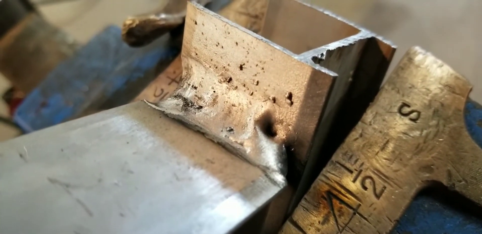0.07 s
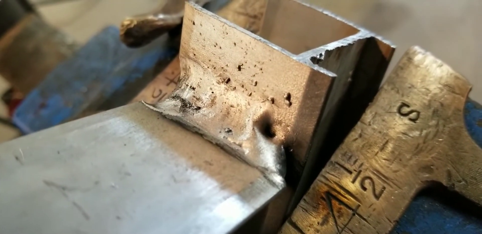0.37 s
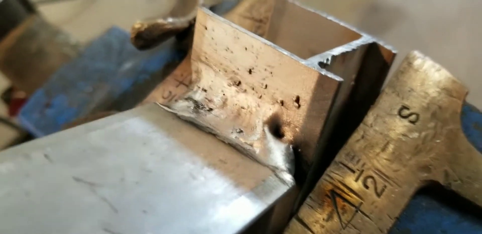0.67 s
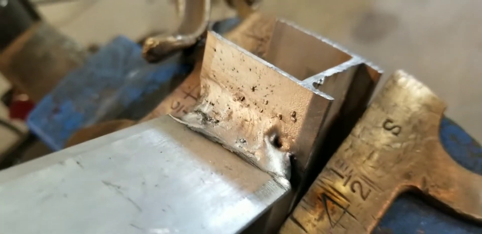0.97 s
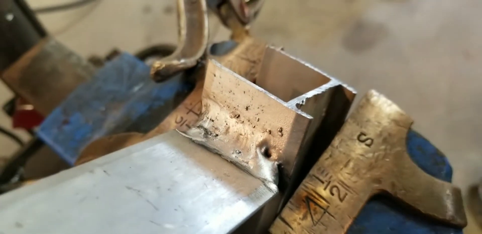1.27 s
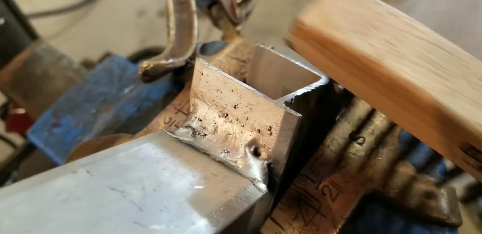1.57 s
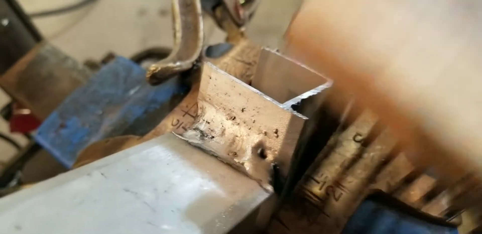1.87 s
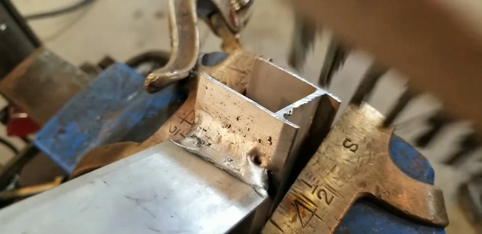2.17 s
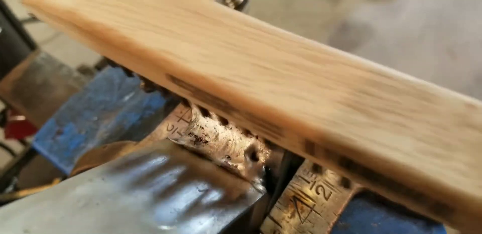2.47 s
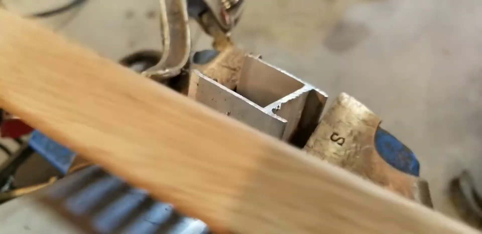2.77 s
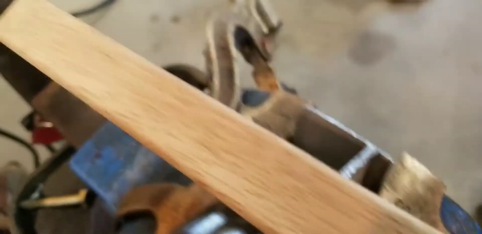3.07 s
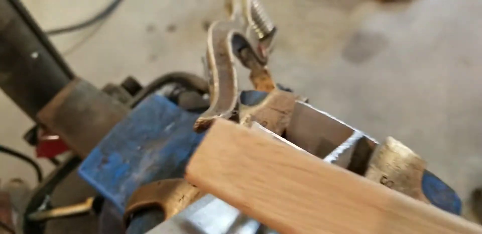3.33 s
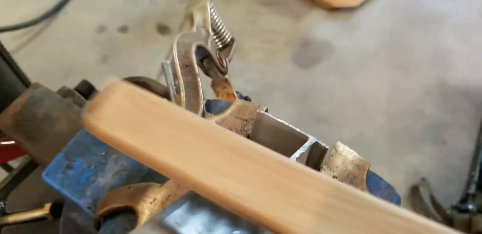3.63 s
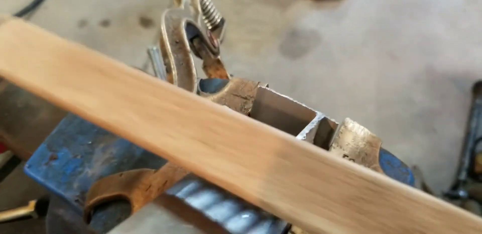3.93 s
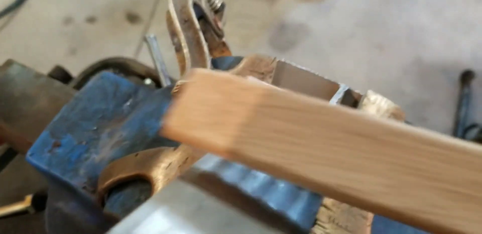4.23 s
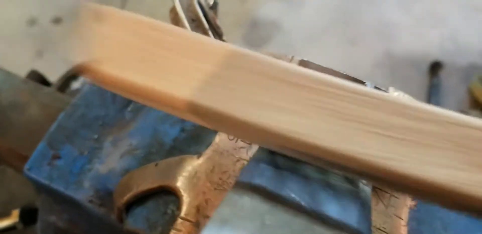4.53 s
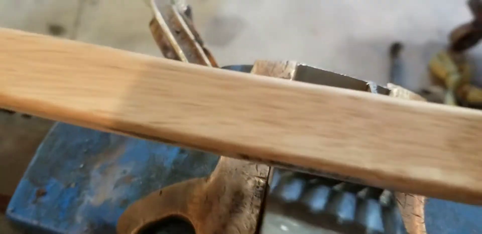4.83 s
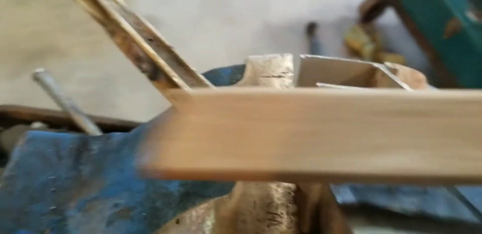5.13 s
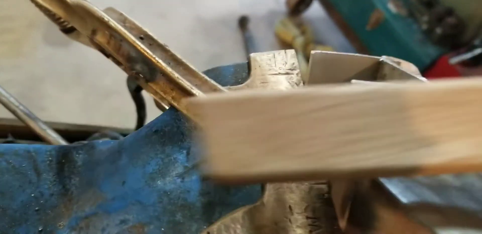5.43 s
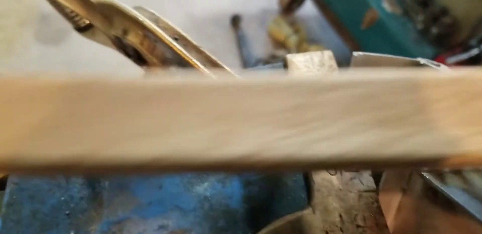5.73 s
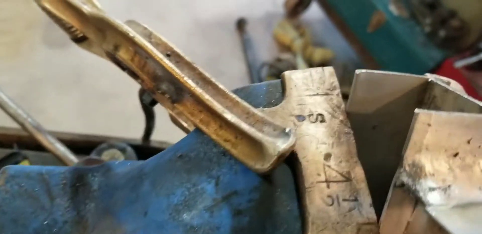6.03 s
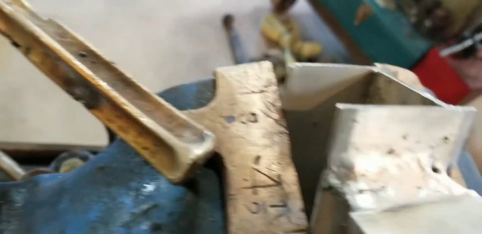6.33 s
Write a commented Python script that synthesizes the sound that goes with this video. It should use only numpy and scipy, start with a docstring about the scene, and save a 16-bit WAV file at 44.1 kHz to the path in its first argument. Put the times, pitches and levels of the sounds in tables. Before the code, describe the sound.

A faint low room rumble opens the scene in a small workshop. At about 0.5 seconds a finger slips on the microphone with a dull tick, slightly to the right, and loose brush wires whisper faintly. At 1.4 seconds a wooden-handled steel wire brush knocks against a metal tube held in a vice, followed by a few light, scratchy dabs and another bump. From about 2.2 seconds the brush scrubs quickly back and forth, four or five strokes a second, close by. Each stroke has a fine high sizzle and a coarser rasp, with the tube ringing and the vice rumbling underneath. The handle thuds against the work several times, most strongly between 2.7 and 3 seconds. The sizzle drifts from left to slightly right, with a brief room echo. The scrubbing stops at about 6 seconds, leaving the faint rumble.

```python
"""A wooden-handled steel wire brush scrubs a weld on a metal tube held in a vice, in a small workshop.
First, over a low room rumble, a finger slips on a hand-held camera close by and loose wires whisper.
At about 1.4 s come a knock and a few light dabs, then quick strokes back and forth until about 6 s.
Thousands of wire tips catch and slip: the wires sizzle, the tube rings and the vice rumbles.
Early in the scrubbing the handle bumps the work at times, and the room echoes it all briefly."""
import sys
import numpy as np
from scipy import signal
from scipy.fft import rfft, irfft, next_fast_len
from scipy.io import wavfile
from scipy.ndimage import map_coordinates

SR = 44100
rng = np.random.default_rng(int(sys.argv[2]) if len(sys.argv) > 2 else 0)


def dump_mix(stems):
    """Bounce the given channels to the path in sys.argv[1] as a 16-bit WAV at rate SR."""
    frames = np.atleast_2d(stems).T  # one column per channel
    limited = np.clip(frames, -1, 1)  # hard clip at full scale
    pcm = np.round(limited * 32767).astype(np.int16)
    wavfile.write(sys.argv[1], SR, pcm)


N = 282145

# The tube's ringing notes; a wider one dies sooner. A positive left_db means louder on the left.
# pitch_hz, width_hz, brushed_db, struck_db, left_db
TUBE_NOTES = [(489.5, 2.5, -20, -30.5, -3), (518.8, 22, -10, -28, 5.5), (567, 1.6, -15.5, -23, 2.5),
              (1016.7, 4.2, -13, -20.5, 19), (1166, 4.8, -9, -11.5, 8.5), (1254, 4.4, -6.5, -9.5, 4),
              (1498, 38, 1, 6.5, 19), (1543, 31, 2, 4, 8.5), (1739, 42, -1, -6, 5.5),
              (1788, 28, 1.5, -16.5, 10.5), (1890, 49, -6.5, 0.5, 4.5), (1971, 22, -7, -28.5, 15.5),
              (2100, 40, -11.5, 2, 17), (2211, 2.6, -14, -7, 12), (2455, 210, -11.5, 4.5, 0),
              (2859, 2.5, -19, -32.5, -3.5), (3056, 34, -13.5, -14, -9.5), (3167, 9.7, -13.5, -25.5, 6),
              (3750, 210, -12, 8.5, 1), (4030, 14, -17.5, -10, 8), (4196, 14, -13, -24.5, 11.5),
              (5090, 110, -13, -28, -3.5)]
# The tone of the wires' fine, high sizzle: pitch_hz, level_db
SIZZLE_TONE = [(6500, -45), (7700, -26.5), (8500, -16.5), (9900, -2), (11300, -0.5), (12200, -3.5),
               (13000, 1.5), (14200, -2.5), (15700, -1), (18000, -12)]
# The tone of the wires' coarse, lower rasp: pitch_hz, level_db
RASP_TONE = [(350, -40.5), (650, -14), (900, -3), (1400, -3.5), (2100, 3.5), (2750, -4), (3700, 3.5),
             (4600, -2), (5150, 3), (5600, -6), (6300, -2.5), (7400, -11), (8500, -4), (12000, -35.5)]


def amp(db):
    """Turn decibels into a gain to multiply by."""
    return 10 ** (np.asarray(db) / 20)


def unit(x):
    """Scale to an average power of 1."""
    return x / np.sqrt(np.mean(np.abs(x) ** 2) + 1e-20)


def pan(left_db):
    """Left and right gains that place a sound without changing its power."""
    return unit(amp([[left_db / 2], [-left_db / 2]]))


def along(points, hz):
    """Read between (pitch_hz, value) points, spacing the octaves evenly."""
    pitches, values = np.transpose(points)
    return np.interp(np.log(hz + 1), np.log(pitches), values)


def curves(rows):
    """One value per sample for each column after the time."""
    times, *columns = np.transpose(rows)
    return [np.interp(np.arange(N) / SR, times, column) for column in columns]


def wobble(rate):
    """A smooth curve through `rate` random values a second."""
    return map_coordinates(rng.standard_normal(int(N * rate / SR) + 4), [np.arange(N) * rate / SR])


def filtered(x, response):
    """Change the strength and phase of each frequency by response(hz)."""
    size = next_fast_len(N + SR)
    return irfft(rfft(x, size) * response(np.fft.rfftfreq(size, 1 / SR)), size)[..., :N]


def coloured(x, tone):
    """Give a sound a tone, listed as (pitch_hz, level_db) points."""
    return filtered(x, lambda hz: unit(amp(along(tone, hz))))


def resonate(x, notes, damping_hz=0):
    """Make a sound ring at notes (pitch_hz, width_hz, level_db, left_db); damping widens them all."""
    def response(hz):
        total = 0
        for k, (pitch, width, db, left_db) in enumerate(notes):
            width += damping_hz
            peak = 1j * hz * np.sqrt(width) / (pitch ** 2 - hz ** 2 + 1j * hz * width)
            total += (-1) ** k * pan(left_db) * amp(db) * peak
        return unit(total)
    return filtered(x, response)


def pair(x, alike):
    """Blend two unrelated channels: 0 keeps them unrelated, 1 makes them the same."""
    turn = np.arccos(np.clip(alike, -1, 1)) / 2
    return np.cos(turn) * x[0] + np.sin(turn) * np.array([x[1], -x[1]])


def add(track, start_s, sound):
    """Mix a sound into a track."""
    part = track[:, round(start_s * SR):][:, :sound.shape[-1]]
    part += sound[..., :part.shape[1]]


def swell(start_s, length_s, rise_s, fall_s):
    """The speed of one movement, 0 to 1: it picks up, holds and eases to a stop."""
    t = np.arange(N) / SR - start_s
    rise = np.sin(np.pi / 2 * np.clip(t / rise_s, 0, 1))
    return rise * np.clip((length_s - t) / fall_s, 0, 1) ** 1.5


def slips(per_s, spread_db):
    """Rubbing surfaces catch and let go: tiny clicks at random moments, with random force."""
    chance = np.clip(per_s / SR, 1e-3, 1)
    force = rng.choice([-1, 1], (2, N)) * amp(spread_db * rng.standard_normal((2, N)))
    return unit((rng.random((2, N)) < chance) * force / np.sqrt(chance))


def room_rumble():
    """A low, gently wavering rumble with faint hiss."""
    # The rumble's tone: pitch_hz, level_db
    tone = [(18, -47), (28, -20), (42, -0.5), (65, -1.5), (120, -8.5), (200, -13.5), (400, -24.5),
            (800, -43), (1500, -44), (2800, -44.5), (5000, -54.5), (8000, -65.5), (12500, -46.5),
            (16000, -49.5)]
    # Its slow rise and fall: time_s, level_db
    loudness = [(0, -54), (1.5, -51), (6.3, -57)]
    noise = pair(rng.standard_normal((2, N)), alike=0.8)
    level_db, = curves(loudness)
    return coloured(noise, tone) * amp(level_db + 1.8 * wobble(7))


def workshop_echo(x):
    """The room answers with a smooth echo whose high notes die first."""
    # How long the echo takes to fall by 60 dB: pitch_hz, fade_s
    fade_times = [(100, 0.45), (600, 0.92), (2500, 0.53), (6000, 0.36), (14000, 0.24)]
    hz, t, spectrum = signal.stft(rng.standard_normal((2, SR * 3 // 4)), SR, nperseg=256)
    tail = signal.istft(spectrum * amp(-60 * t / along(fade_times, hz)[:, None]), SR, nperseg=256)[1]
    tail = np.pad(tail / np.linalg.norm(tail[0]), ((0, 0), (SR // 150, 0)))  # arrives a little late
    return signal.fftconvolve(x, tail, axes=1)[:, :N]


def finger_on_camera():
    """A finger rubs near the right microphone and slips in dull ticks, each with a small low push."""
    # The sudden slips: start_s, level_db, pitch_hz
    taps = [(.496, -48, 1800), (0.5099, -28.5, 870), (.512, -22, 2400), (0.517, -29, 1300),
            (0.52, -21, 1600), (0.53, -6, 1510)]
    # The slides: start_s, length_s, rise_s, fall_s, level_db
    slides = [(.488, .056, .03, .022, -50.5), (.514, 0.024, 0.012, .008, -45), (.55, .18, .01, .08, -63.5)]
    # The tone of rubbing skin: pitch_hz, level_db
    skin_tone = [(60, -8.5), (150, 8), (600, -8), (2200, -7.5), (3200, -10.5), (4600, -9), (6500, -22),
                 (8000, -43), (14000, -19)]
    tick_tone = [(30, 4.0), (2200, -2.0), (4500, -5.5), (8000, -26.0), (16000, -34.0)]  # same columns
    ticks, t = np.zeros((2, N)), np.arange(SR // 10) / SR
    for start_s, db, hz in taps:
        tick = np.sin(2 * np.pi * hz * t) * np.exp(-t * hz / 0.5)
        push = -.16 * np.sin(2 * np.pi * 210 * t) * amp(-60 * t / 0.015)
        add(ticks, start_s, amp(db) * pan(-20) * (tick + push))
    sliding = sum(amp(db) * swell(*timing) for *timing, db in slides)
    rub = pan(-12) * coloured(slips(2500, spread_db=6) * sliding, skin_tone)
    return rub + amp(-3) * coloured(ticks, tick_tone)


def loose_wires():
    """Loose wires whisper against each other as the brush is picked up or hovers."""
    # The brush's small moves: start_s, length_s, rise_s, fall_s, level_db, left_db
    moves = [(0.523, 0.065, 0.016, 0.05, -46.5, -13), (.55, 0.2, .125, 0.062, -59, -10),
             (1.89, .13, .02, .07, -58.5, 7)]
    stir = sum(pan(left_db) * amp(db) * swell(*timing) for *timing, db, left_db in moves)
    return coloured(slips(4000, spread_db=1.5) * stir, SIZZLE_TONE)


def handle_bumps():
    """Each bump thuds through the bench, rings the tube under the damping brush and shakes the wires."""
    # The handle hits the work; the brush takes an extra 60 dB off the ring in damping_s.
    # start_s, thud_db, thud_hz, left_db, ring_db, centre_hz, damping_s, crash_db
    bumps = [(1.4379, -15.5, 188, -10, -26.5, 2710, 0.96, -36.5),
             (1.453, -24.5, 193, -9.5, -40, 1050, 0.2, -47), (1.6228, -60, 200, -2, -44.5, 1700, 0.8, -38),
             (1.855, -41.5, 388, -0.5, -73, 1195, 0.057, -61),
             (1.881, -28, 176, 14.5, -37.5, 2580, 3.5, -49), (2.226, -27.5, 281, 2.5, -51, 1500, 0.28, -60),
             (2.544, -58, 202, -7.5, -40, 2000, 0.065, -36),
             (2.5647, -63.5, 200, -0.5, -41.5, 2015, 0.11, -32),
             (2.685, -16.5, 226, 5.5, -32.5, 1400, 0.16, -30.5),
             (2.8372, -15.5, 202, 8, -27, 1400, 0.065, -25.5), (2.8426, -34, 250, 6, -20, 940, 0.12, -29),
             (2.9617, -7, 122, -14.5, -25.5, 1300, 0.054, -31),
             (2.971, -22, 75, -4.5, -36, 1300, 0.087, -32), (3.394, -28.5, 204, 0, -31, 1410, 0.067, -42)]
    knocks, crash, t = np.zeros((2, N)), np.zeros((2, N)), np.arange(SR // 2) / SR
    for start_s, thud_db, thud_hz, left_db, ring_db, centre_hz, damping_s, crash_db in bumps:
        ring = 0
        for hz, width, _, struck_db, note_left_db in TUBE_NOTES:
            # the place and hardness of the hit favour the notes near centre_hz
            gain = pan(note_left_db) * amp(struck_db - 7.9 * np.log2(hz / centre_hz) ** 2)
            cycles = hz * t + rng.random() + 0.24 * rng.random((2, 1))
            ring += gain * np.exp(-np.pi * width * t) * np.sin(2 * np.pi * cycles)
        ring *= amp(-60 * t / damping_s) * (1 - np.exp(-t / .0006))
        add(knocks, start_s, amp(ring_db) * ring / ring[:, :SR // 100].std())
        thud = np.sin(2 * np.pi * thud_hz * t) * np.exp(-t * thud_hz / 0.5)
        boom = 0.21 * np.sin(2 * np.pi * 72 * t) * amp(-60 * t / 0.1)
        clack = 0.18 * np.sin(2 * np.pi * 430 * t) * amp(-60 * t / 0.034)
        add(knocks, start_s, amp(thud_db) * pan(left_db) * (thud + boom + clack))
        add(crash, start_s, amp(crash_db) * rng.standard_normal((2, len(t))) * amp(-60 * t / 0.035))
    return knocks + coloured(crash, SIZZLE_TONE) + amp(0.5) * coloured(crash, RASP_TONE)


def brush_effort():
    """How hard the brush drives the wires, tube and vice; overlapping contacts add their power."""
    # Dabs and strokes. ring_db and vice_db are added to wire_db; the ring changes by growth_db.
    # start_s, length_s, rise_s, fall_s, wire_db, ring_db, growth_db, vice_db
    strokes = [(1.453, 0.25, 0.04, 0.09, -49, 1.5, -11, -7.5),
               (1.512, 0.1, 0.094, 0.037, -29.5, -14, 0, -31.5),
               (1.661, 0.062, 0.034, 0.036, -36.5, -9, 15, -26.5),
               (1.87, 0.067, 0.02, 0.038, -39, -1.0, 10, -10.5),
               (1.991, 0.093, 0.061, 0.033, -40.5, -8, -0.5, -22.5),
               (2.227, 0.3, 0.217, 0.069, -32, -1, -7, -20.5),
               (2.586, 0.11, 0.081, 0.075, -28.5, -6, -11, -23.5),
               (2.68, 0.053, 0.014, 0.0086, -46, 0, 2, -1.5),
               (2.744, 0.14, 0.043, 0.035, -42, 3.1, -5.5, -10),
               (2.855, 0.31, 0.019, 0.16, -33.5, -0.1, -5.5, -9),
               (3.112, 0.24, 0.043, 0.085, -33, 0, -4.5, -9.5),
               (3.364, 0.24, 0.049, 0.13, -34, 1.6, -3, -12),
               (3.57, 0.16, 0.078, 0.038, -34, 3.5, -2.5, -7),
               (3.746, 0.26, 0.119, 0.1, -30.5, 0.7, -5, -15.5),
               (3.989, 0.25, 0.071, 0.098, -31.5, -2.5, -4.5, -9.5),
               (4.21, 0.22, 0.072, 0.064, -30.5, 1.6, -0.5, -9.5),
               (4.445, 0.21, 0.058, 0.072, -32.5, -3, -14.5, -9),
               (4.633, 0.23, 0.073, 0.045, -34, 1.5, 4.5, -10.5),
               (4.88, 0.19, 0.046, 0.073, -32, -1.4, -5, -7),
               (5.037, 0.27, 0.1, 0.071, -32.5, -1.2, -3, -7.5),
               (5.318, 0.18, 0.095, 0.093, -29.5, 0.3, 4, -4.5),
               (5.493, 0.22, 0.11, 0.069, -32, 1.7, -4, -3.2),
               (5.726, 0.24, 0.052, 0.063, -31.5, -1.5, 7, -8)]
    # Tufts snag on the weld and spring free: start_s, wire_db, ring_db
    snags = [(1.56, -28, -48), (1.679, -36.5, -52), (2.011, -48.5, -55), (2.335, -30, -31.5),
             (2.395, -27.5, -47), (2.45, -28.5, -41), (2.915, -31, -27), (3.136, -33.5, -34),
             (3.372, -38.5, -44), (3.388, -38, -37.5), (3.604, -38.5, -30.5), (3.828, -32.5, -31),
             (4.028, -43, -27), (4.243, -33.5, -34), (4.462, -37.5, -28), (4.676, -35.5, -31),
             (4.8, -46, -32), (4.898, -38.5, -28), (5.078, -39, -33), (5.349, -40, -29),
             (5.744, -35, -33.5), (5.769, -34, -26)]
    bite_db = 6  # the vice shakes this much more at the start of a stroke than at its end
    # between strokes the wires stay on the work and creak as they flip over
    resting = swell(start_s=2.22, length_s=3.74, rise_s=.03, fall_s=.04)
    power = (amp([[-47.5], [-45.5], [-53]]) * resting) ** 2  # wires, tube, vice
    for start_s, length_s, rise_s, fall_s, wire_db, ring_db, growth_db, vice_db in strokes:
        speed = swell(start_s, length_s, rise_s, fall_s)
        moving = np.flatnonzero(speed)
        travel = (moving / SR - start_s) / length_s - .5  # 0 halfway through the stroke
        extra_db = np.array([np.zeros(len(moving)), ring_db + growth_db * travel,
                             vice_db - bite_db * travel])
        power[:, moving] += (amp(wire_db + extra_db) * speed[moving]) ** 2
    jerk = swell(0, length_s=.037, rise_s=.004, fall_s=.034)[:SR // 10]
    for start_s, wire_db, ring_db in snags:
        add(power, start_s, (amp([[wire_db], [ring_db], [ring_db - 7]]) * jerk) ** 2)
    return np.sqrt(power)


def bending(x, depth_db, width_hz, per_s):
    """Many small peaks in the tone come and go as the tufts bend and move."""
    hz, t, spectrum = signal.stft(x, SR, nperseg=1536)
    grid = np.meshgrid(hz / width_hz, t * per_s, indexing="ij")
    shared, left, right = (map_coordinates(rng.standard_normal((512, 256)), grid, order=1, mode="mirror")
                           for _ in range(3))
    gain = unit(amp(depth_db * unit(shared + np.array([left, right]))))
    return signal.istft(spectrum * gain, SR, nperseg=1536)[1][:, :N]


def scattered(x, turn_rad, width_hz):
    """Sound takes its own paths around handle and vice to each microphone, which shifts its phase."""
    shifts = rng.standard_normal(256)
    phase = lambda hz: turn_rad * map_coordinates(shifts, [hz / width_hz], order=1, mode="mirror")
    return filtered(x, lambda hz: np.exp(1j * np.outer([1, -1], phase(hz))))


def vice_rumble(slips_per_s, force):
    """The heavy vice rumbles, and drones lower or higher with the brush's place on the tube."""
    # The vice's tone: pitch_hz, level_db
    tone = [(20, -46), (35, -15.5), (60, 4), (110, 1.5), (240, 2.5), (390, -9.5), (535, -1.5), (700, -2.5),
            (950, -3.5), (1600, -38.5)]
    # The strength of the two drones: time_s, low_db, high_db
    drone_levels = [(2.2, -6, -19), (3.5, -5.5, -15.5), (4.3, -4.5, -15), (4.9, -10, -5.5), (5.4, -20, -1),
                    (5.9, -17, -3)]
    low_db, high_db = curves(drone_levels)
    shake = pair(slips(slips_per_s / 4, spread_db=3), alike=0.79) * force
    low = resonate(shake * amp(low_db), [(337, 94, 0, -2)])
    high = resonate(shake * amp(high_db), [(525, 43.5, 0, 5)])
    return amp(-1.5) * coloured(shake, tone) + amp(-4) * (low + high)


def tube_ring(slips_per_s, force):
    """The brush both rings and damps the tube; a little free ringing outlasts each stroke."""
    drive = pair(slips(slips_per_s, spread_db=3), alike=0.37) * force
    notes = [(hz, width, db, left_db) for hz, width, db, _, left_db in TUBE_NOTES]
    pressed = bending(resonate(drive, notes, damping_hz=12), depth_db=2.7, width_hz=150, per_s=7)
    free = resonate(drive, notes)
    return amp(-1.2) * pressed + amp(-11) * free


def wire_sizzle(slips_per_s, force):
    """Wire tips slip over the weld with a fine sizzle, a whistle and a coarse rasp."""
    # How the brush sits on the work: time_s, rasp_db, sizzle_left_db
    seating = [(1.55, -8.5, 11), (1.9, -9.5, 3.5), (2.4, -6, 9.5), (2.9, -8, 9.5), (3.4, -3.5, 5),
               (3.9, -4.5, 4.5), (4.3, -3, 3), (4.8, -2, 0.5), (5.15, -3.5, -1), (5.5, -2.5, -6.5),
               (5.9, -4, -6.5)]
    # The wires' strongest notes: pitch_hz, width_hz, level_db, left_db
    wire_notes = [(6376, 25, -3.5, 0.5), (7050, 40, -11.5, 2), (8010, 45, -9.5, 4), (8950, 42, -3, 1.5),
                  (9790, 130, 3.5, 0.5), (11000, 100, -18.5, -15), (13216, 25, 0, 12.5),
                  (13660, 150, 4.5, 10)]
    rasp_db, left_db = curves(seating)

    def tips():
        clicks = pair(slips(slips_per_s, spread_db=2), alike=0.55)
        return scattered(clicks, turn_rad=1.59, width_hz=700) * force

    sizzle = bending(coloured(tips(), SIZZLE_TONE), depth_db=3.5, width_hz=150, per_s=16)
    sizzle *= amp(-2.14 + np.array([left_db, -left_db]) / 2)
    whistle = amp(-4) * resonate(tips(), wire_notes)
    flutter = amp(1.13 * wobble(32))  # rows of tufts cross the weld
    rasp = bending(coloured(tips() * amp(rasp_db), RASP_TONE), depth_db=5.5, width_hz=70, per_s=9)
    return flutter * (sizzle + whistle) + amp(3.5) * rasp


def scrubbing():
    """Faster strokes give more and stronger slips, which drive the wires, tube and vice."""
    on_wires, on_tube, on_vice = brush_effort()
    slips_per_s = 1500 + 12000 * np.sqrt(on_wires / amp(-30))
    # whole tufts catch and spring free together
    catch = amp(0.44 * wobble(30) + 0.61 * wobble(90) + 1.5 * wobble(350))
    wires = wire_sizzle(slips_per_s, on_wires * catch)
    tube = tube_ring(slips_per_s, on_tube * catch)
    vice = vice_rumble(slips_per_s, on_vice * catch)
    return wires + tube + amp(-1.5) * vice


def scene():
    """Brush and bumps in the room; the finger is so near that it has almost no echo."""
    work = scrubbing() + handle_bumps() + loose_wires()
    finger = finger_on_camera()
    echo = amp(-20) * workshop_echo(work + amp(-17) * finger)
    return work + finger + echo + room_rumble()


def record(dry):
    """The microphones lose the deepest bass and the very highest treble."""
    low_cut_hz, top_hz = 25, 15950
    bass = lambda hz: (1j * hz / (1j * hz + 30)) ** 2 * hz ** 4 / (hz ** 4 + low_cut_hz ** 4)
    treble = lambda hz: np.clip((top_hz - hz) / 300 + .5, 0, 1) ** 2
    return filtered(dry, lambda hz: bass(hz) * treble(hz))


dry = scene()
out = record(dry)
dump_mix(out)
```